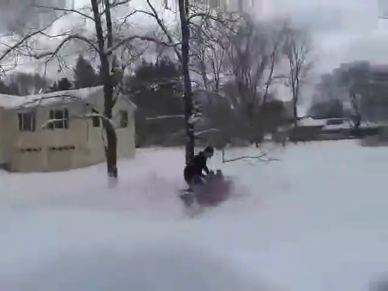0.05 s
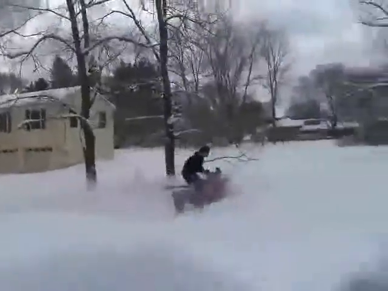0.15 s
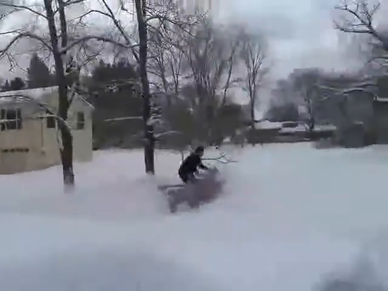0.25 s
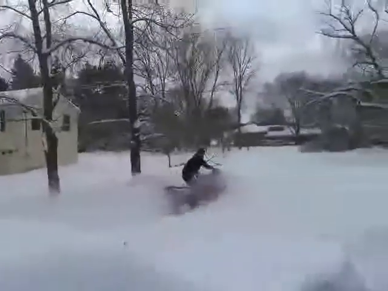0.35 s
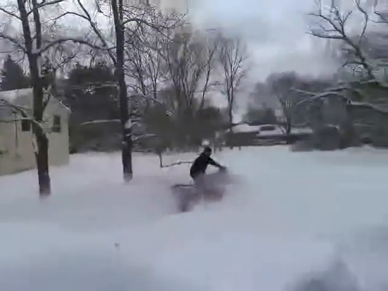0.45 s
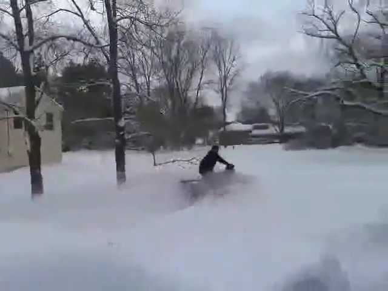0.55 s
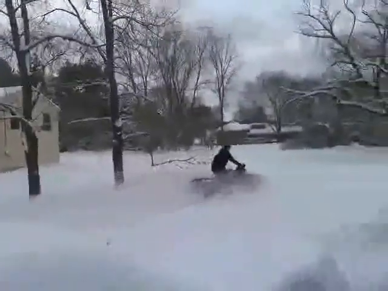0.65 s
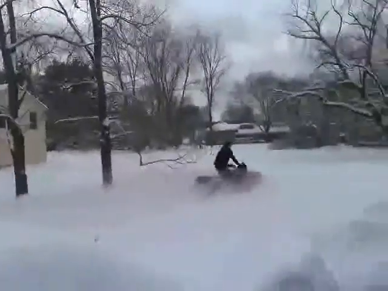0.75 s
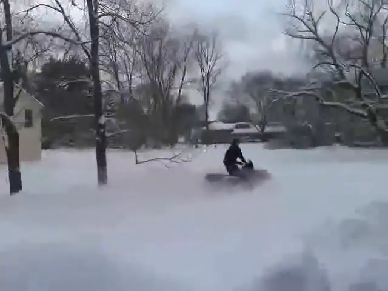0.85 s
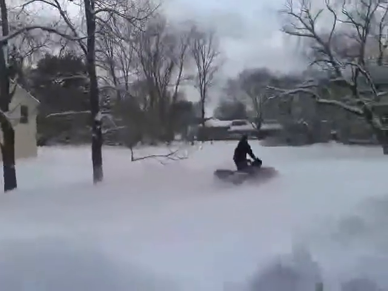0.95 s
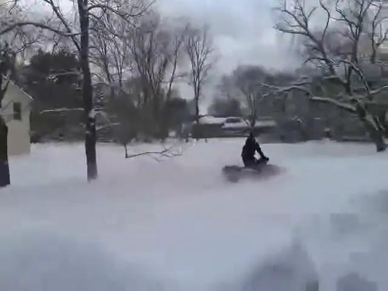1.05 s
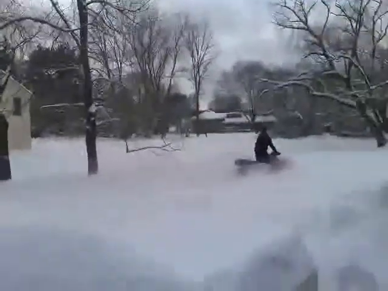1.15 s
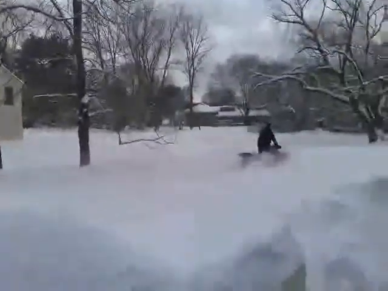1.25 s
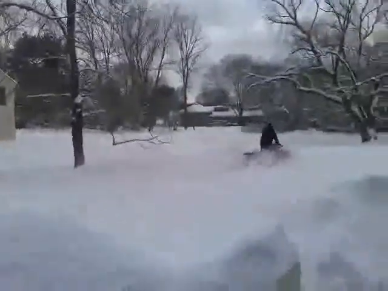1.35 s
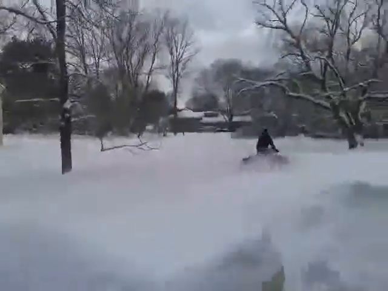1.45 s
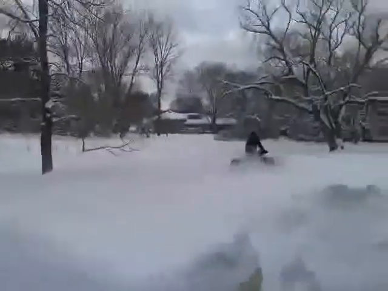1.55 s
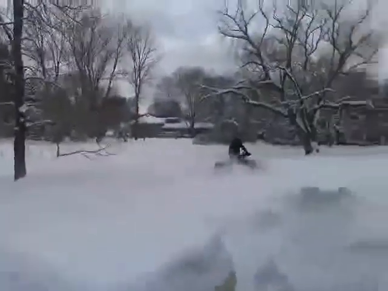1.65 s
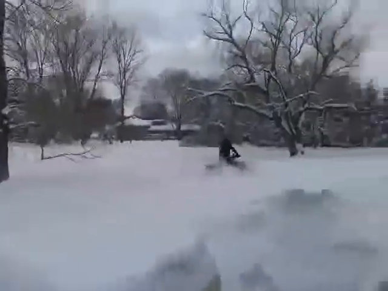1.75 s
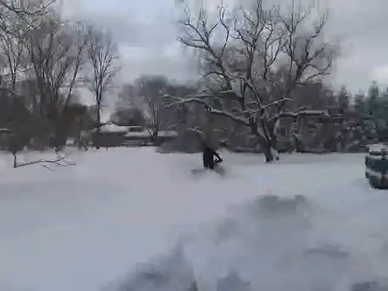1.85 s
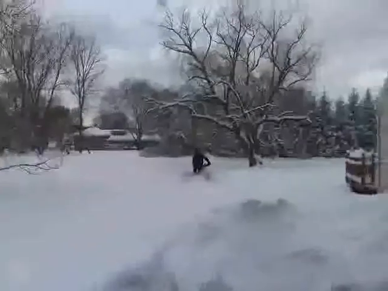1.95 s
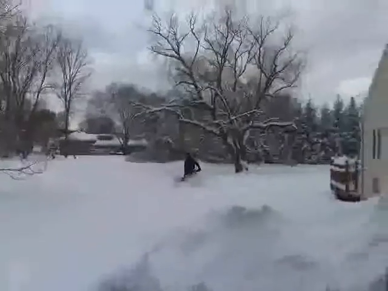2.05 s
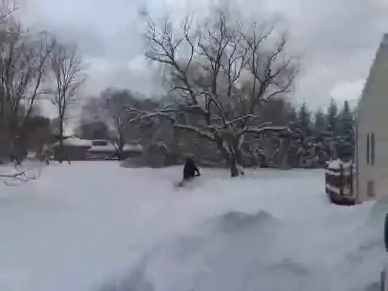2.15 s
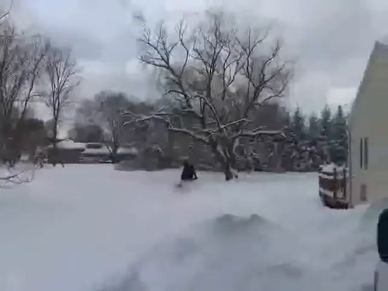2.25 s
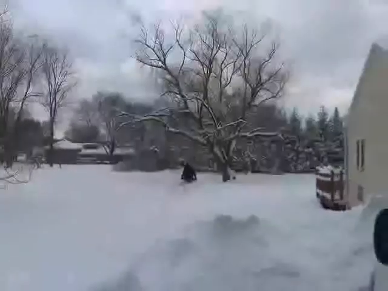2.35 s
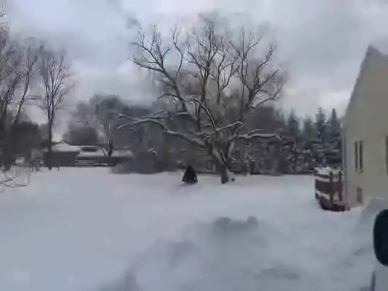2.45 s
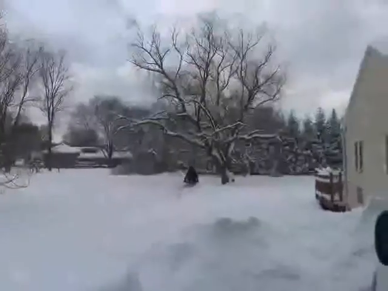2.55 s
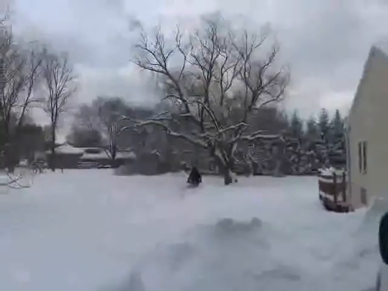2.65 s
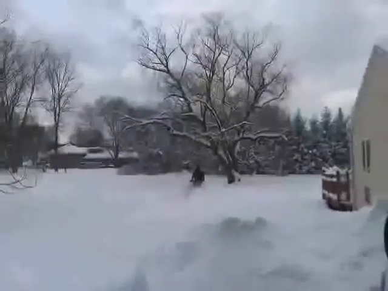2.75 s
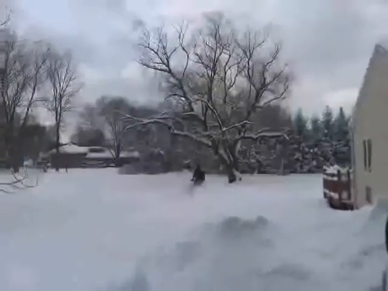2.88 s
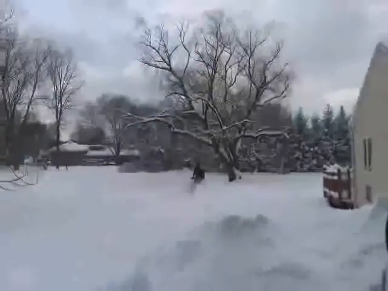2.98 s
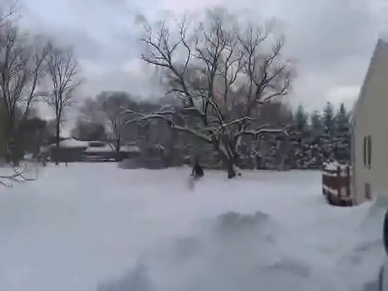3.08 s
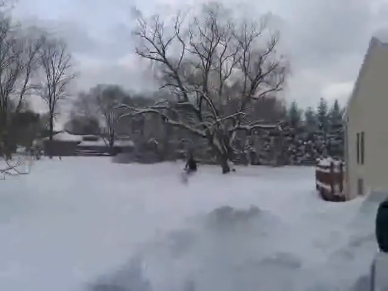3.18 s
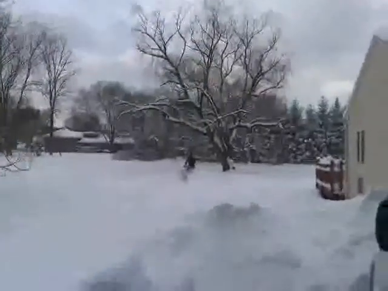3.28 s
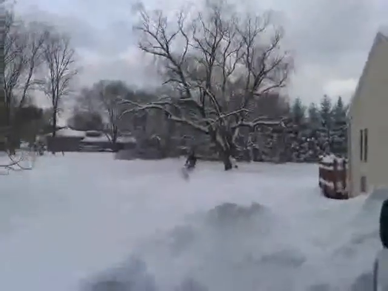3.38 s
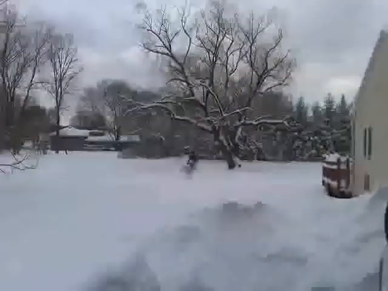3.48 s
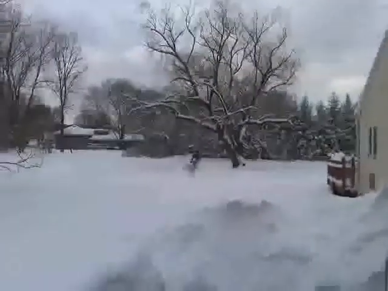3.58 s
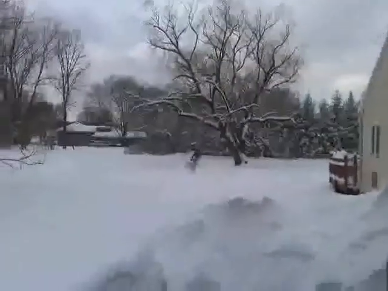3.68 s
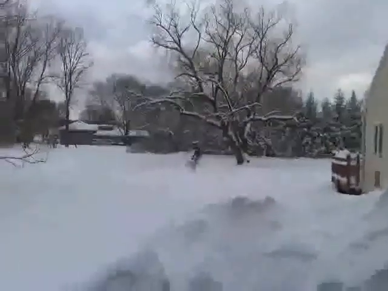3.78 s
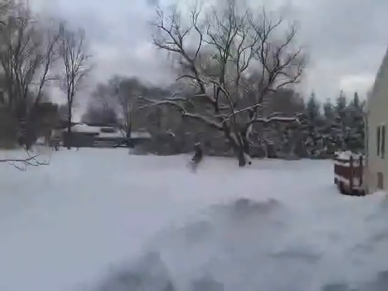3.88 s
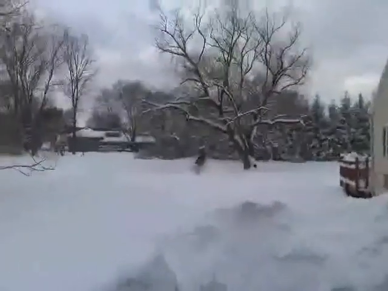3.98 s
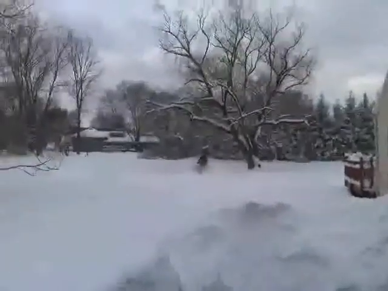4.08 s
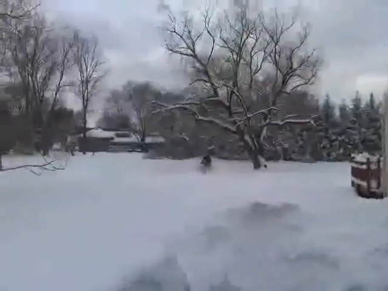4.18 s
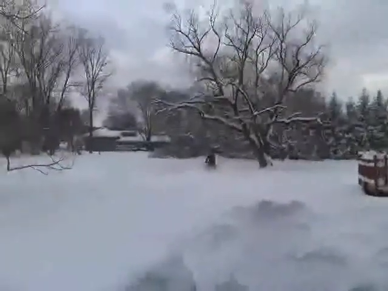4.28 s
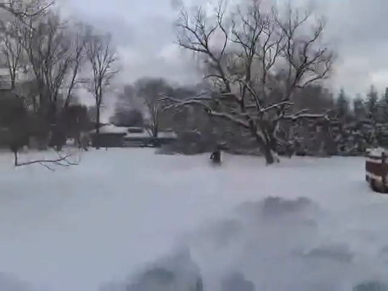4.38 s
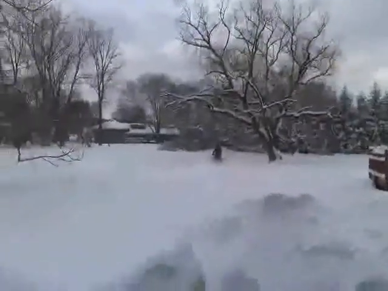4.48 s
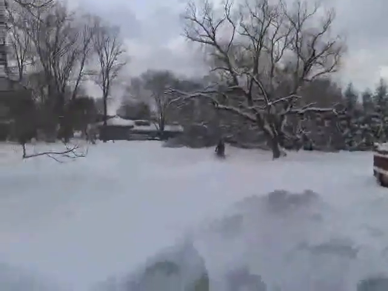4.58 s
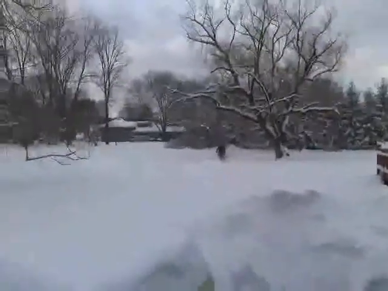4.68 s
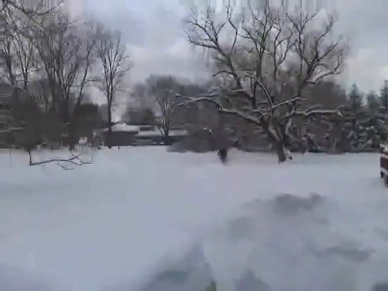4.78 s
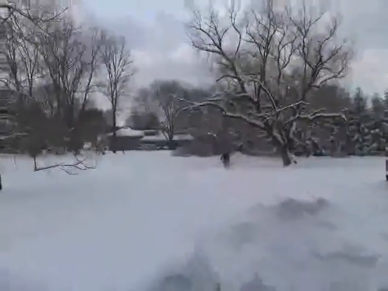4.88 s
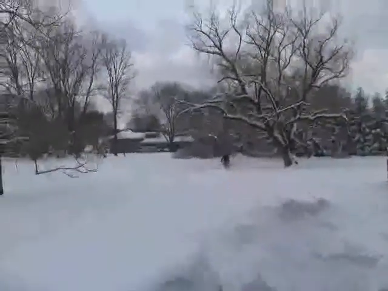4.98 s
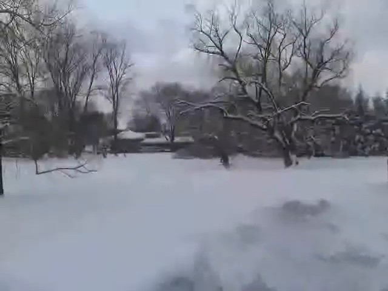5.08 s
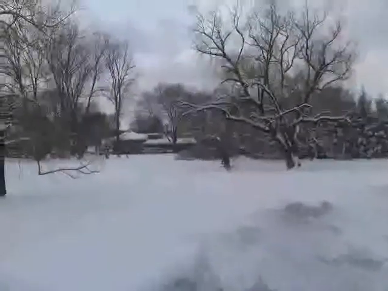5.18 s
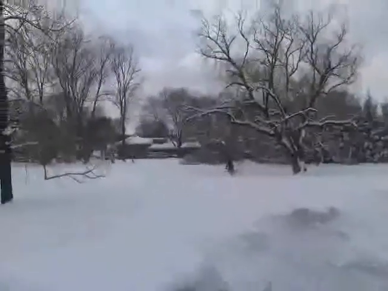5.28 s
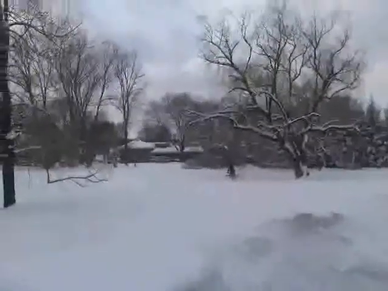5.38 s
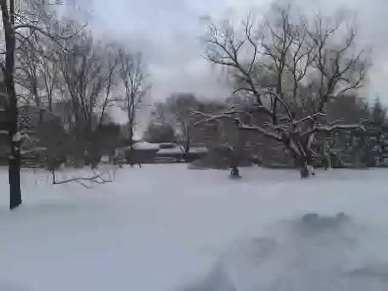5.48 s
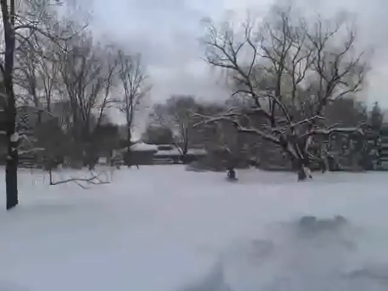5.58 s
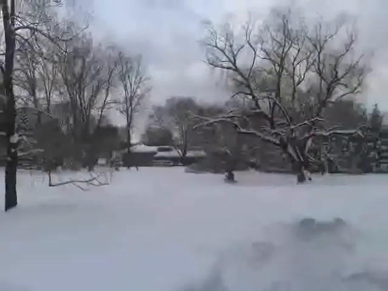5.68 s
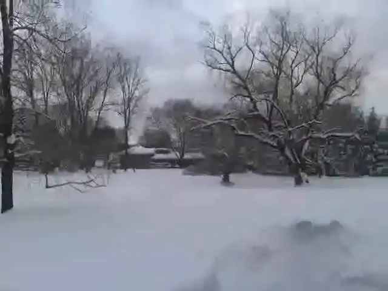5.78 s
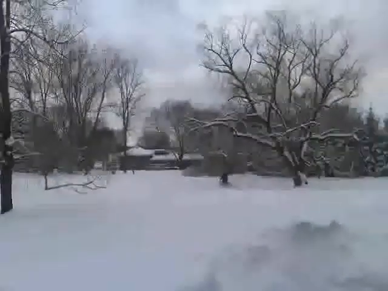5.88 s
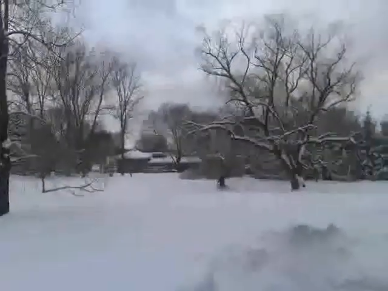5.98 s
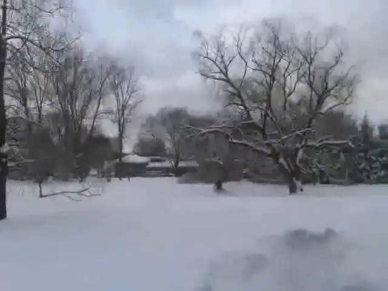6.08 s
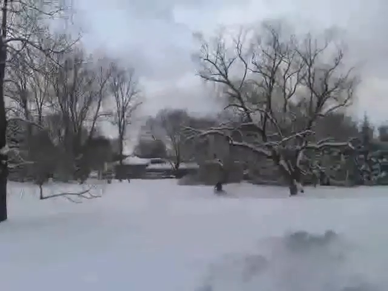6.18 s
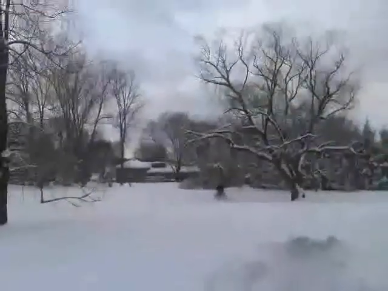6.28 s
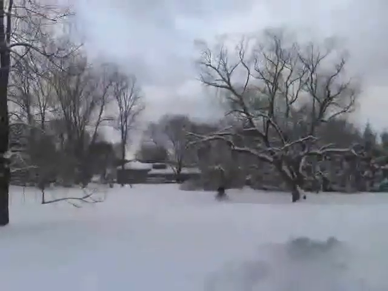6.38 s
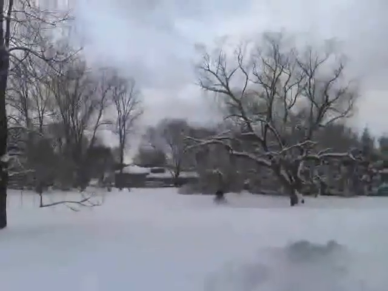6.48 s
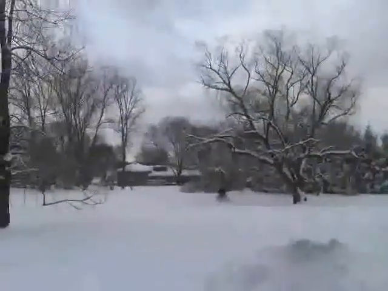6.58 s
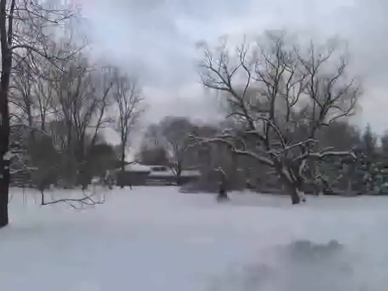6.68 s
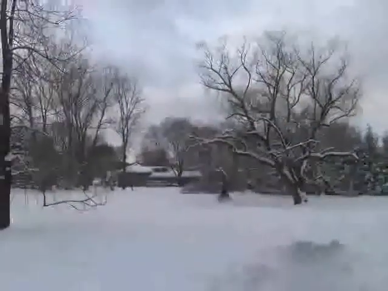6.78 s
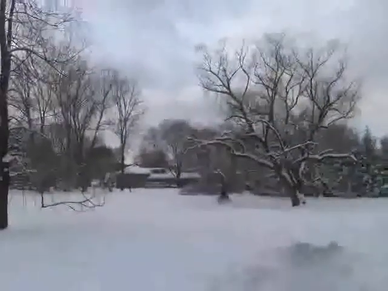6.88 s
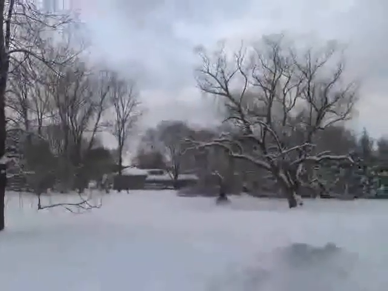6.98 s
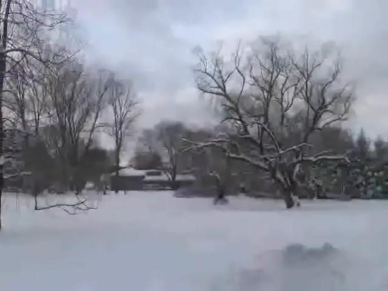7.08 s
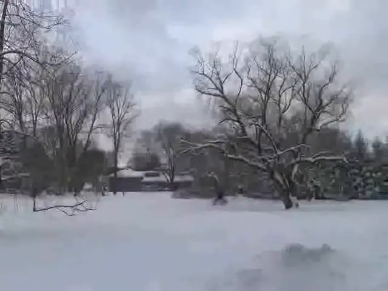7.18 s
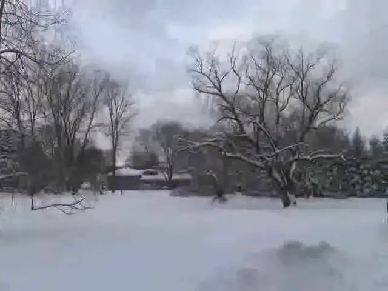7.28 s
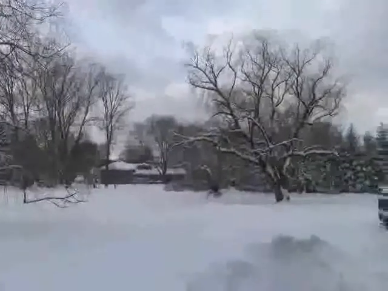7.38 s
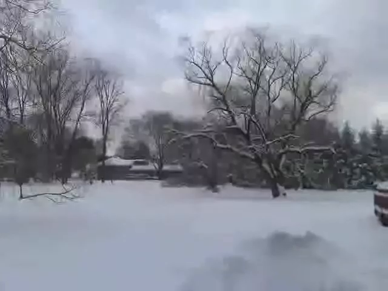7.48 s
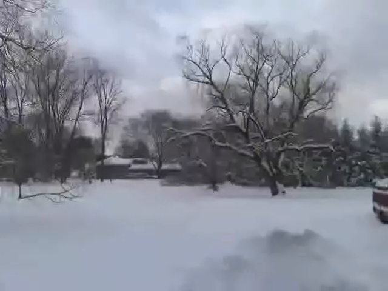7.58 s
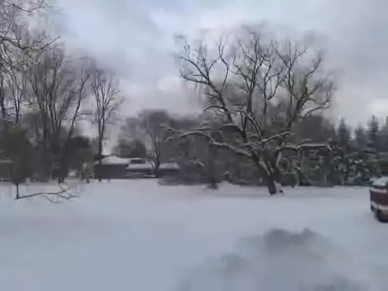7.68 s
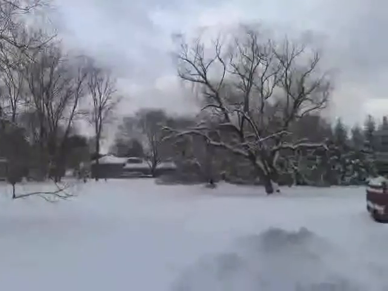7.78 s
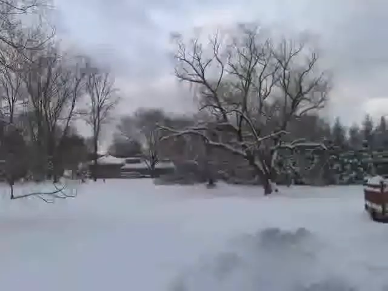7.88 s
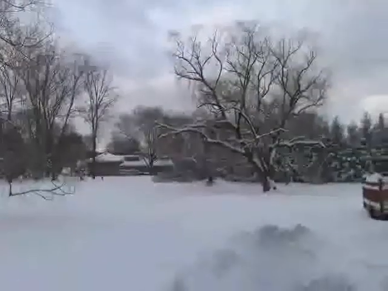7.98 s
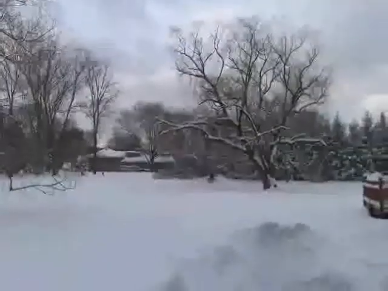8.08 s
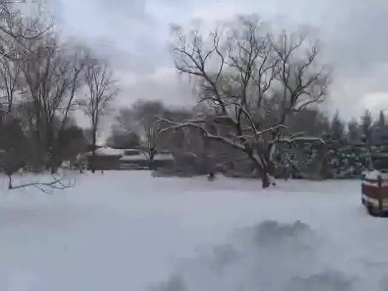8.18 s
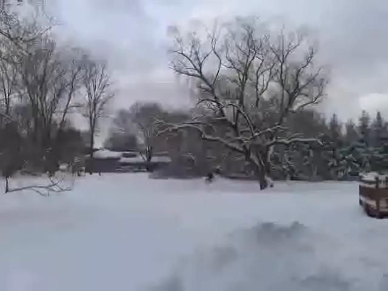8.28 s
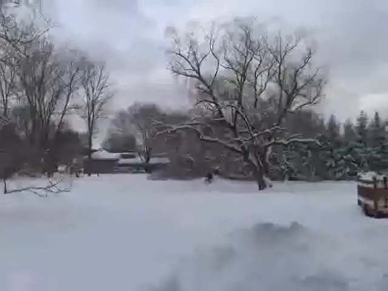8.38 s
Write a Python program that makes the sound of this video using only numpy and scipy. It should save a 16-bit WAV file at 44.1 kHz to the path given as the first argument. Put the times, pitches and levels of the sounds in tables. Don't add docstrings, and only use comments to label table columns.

```python
import sys
import numpy as np
from scipy import signal
from scipy.fft import rfft, irfft, dct
from scipy.io import wavfile
from scipy.ndimage import uniform_filter1d

SR = 44100
rng = np.random.default_rng(int(sys.argv[2]) if len(sys.argv) > 2 else 0)


def field_ratio(decibels):
    return 10 ** (np.asarray(decibels, dtype=float) / 20)


def store_wav(level_fs):
    pcm = np.round(np.clip(np.atleast_2d(level_fs), -1, 1) * 32767)
    wavfile.write(sys.argv[1], SR, pcm.T.astype(np.int16))


N = 372644

# pitch_hz, density_db
HISS = [(60, -1), (120, -0.5), (200, -1.5), (1000, 4), (3000, -3), (5000, -9.5), (11000, -5.5),
        (14500, -17.5)]
HISS_DB = -56
# pitch_hz, step_db, share of the loudness followed (0-1)
ROUNDING_STEPS = [(20, -37, .5), (165, -40.5, .5), (180, -58, 0), (10300, -56, 0), (10450, -42, .35),
                  (12450, -37, .45), (12550, -29, 0), (14500, -27, 0)]
STEP_MOOD_DB = 1.44
# centre_s, length_s, pitch_hz, width_hz, level_db
FLARES = [(0.18, 0.046, 1000, 530, -44.5), (2.486, 0.11, 5900, 510, -38), (2.864, 0.58, 1060, 61.4, -45),
          (4.1, 0.15, 1050, 80, -49.5), (1.722, 0.24, 3600, 2800, -39.5), (1.78, 0.14, 980, 1100, -48),
          (5.131, 0.029, 6960, 6300, -43), (0.14, .11, 430, 320, -46), (.85, 0.18, 680, 210, -45),
          (1.4, 0.22, 12000, 2900, -44.5), (2.7, 0.17, 5300, 820, -47), (8, 0.12, 2100, 720, -53),
          (7.76, 0.062, 2600, 43, -57), (7.75, 0.062, 3160, 50, -57), (.1, .12, 1100, 630, -44),
          (7.68, .14, 1900, 110, -55), (7.67, .07, 1500, 120, -56.5), (7.7, 0.056, 2320, 150, -57),
          (6.6, 0.17, 2430, 120, -58.5), (6.58, 0.015, 2500, 700, -52)]
# time_s, pitch_hz, level_db
WHISTLES = [
    [(6.18, 1105, -58), (6.28, 1070, -46), (6.5, 1000, -47), (6.7, 972, -47), (7.05, 955, -51),
     (7.4, 950, -61), (7.9, 945, -50), (8.3, 905, -52), (8.44, 900, -52)],
    [(7.5, 1790, -65), (7.58, 1825, -49), (7.7, 1880, -45), (7.83, 1932, -45), (7.92, 1915, -70)],
    [(7.6, 2790, -62), (7.78, 2815, -47), (7.95, 2790, -54), (8.3, 2735, -51), (8.4, 2720, -62)],
    [(7.65, 3140, -64), (7.75, 3160, -50), (7.92, 3170, -60)],
]
# delay_s, wander_s, level_db
REFLECTIONS = [(.0009, 0.00013, -19), (.0023, 0.000084, -11), (.0036, 0.0001, -15.5)]

# time_s, firing_rate_hz
CRANK_SPEED = [(0.0, 44.9), (0.17, 44.8), (0.55, 33.31), (1.19, 43.35), (1.36, 37.44), (2.03, 39.11),
               (2.14, 41.59), (2.7, 43.95), (3.26, 42.34), (3.78, 36.7), (3.97, 40.54), (4.25, 38.46),
               (4.87, 41.95), (5.37, 37.74), (5.59, 40.08), (5.93, 39.52), (6.58, 31.89), (8.45, 33.27)]
# centre_s, length_s, rate_change_hz
SLIPS = [
    (3.6, .14, -1.15),
    (6.72, .1, .85),
    (7.45, .15, -1),
    (7.8, .15, 1.15),
    (8.35, .12, -.9),
]
FIRST_TURN = .159
# centre_s, length_s, level_db
SURGES = [(0.108, 0.14, 1.5), (0.527, 0.085, 0), (0.721, 0.12, 4), (1.84, 0.069, -1.5), (2.458, 0.094, 0),
          (2.725, 0.088, -2.5), (3.314, 0.063, -1), (3.42, 0.02, 2), (3.976, 0.11, 0), (4.268, 0.21, -2),
          (4.486, 0.11, 2), (4.947, 0.043, 1), (5.22, 0.17, -1), (5.894, 0.088, 1), (1.06, 0.049, 1),
          (2.137, 0.042, 2), (3.073, 0.08, 1), (5.44, 0.19, 2.5), (7.69, 0.076, 0)]
# time_s, bark_db, brightness_db per octave as the pipe swings round, drone_db as the tail faces us
ENGINE = [(0.0, -37, -0.5, 5), (0.59, -42, 0.5, 3.5), (0.64, -41, -1, 4.5), (1.11, -31, -0.4, 0.5),
          (1.27, -36.5, -0.2, 1), (1.97, -41, 2, 2.8), (2.09, -35.5, 3.5, -1.5), (2.85, -40.5, 4, 2.5),
          (3.11, -38.5, 0.8, -0.5), (3.58, -44.5, -2, -1), (4.0, -39.5, -1, -1), (4.19, -41.5, 1.5, -2),
          (4.94, -40.5, -1, -3), (5.27, -47.5, -0.3, 0.5), (5.39, -45.5, 1.6, -2), (7.2, -51, -1, 1),
          (7.74, -49.5, -1.2, -0.3), (8.45, -51, 0.5, -0.5)]
# time_s, share (0-1)
HEADING = [(0, .95), (.22, 0.8), (.4, 0.2), (1.9, 0.2), (2.3, 0.9), (5.9, 0.8), (6.6, 0.3), (8.45, .6)]

# pitch_hz, density_db
ROAR = [(60, -24), (156, -18.5), (224, -17), (294, -13), (560, -9.5), (760, -5.5), (1000, -4.5),
        (1300, -41)]
# pitch_hz, side_db, rear_db
PIPE = [(80.8, -18.5, -34.5), (117, -12, -19), (170.5, -16, -15.5), (275.5, -7, -11.5), (362, -8, -8),
        (506, -10, -5.5), (599, -15.5, -7.5), (772, -14.5, -13.5)]
PIPE_TOP_HZ = 809
BOOM_HZ, BOOM_WIDTH_HZ, BOOM_DB = 218.2, 28, 15
# pitch_hz, width_hz, level_db
CHAMBERS = [(502, 45, 3), (744, 37, 8.5), (892, 50, 13)]
# time_s, boom_db, higher_orders_db, roar_db
CLARITY = [(0, 5, 0, 0), (.15, 5, -1, 0), (.25, -3, -3, -1), (.6, -2, -2, -1), (1.2, -2, -1, -2),
           (2.0, -1, -2, -5), (2.2, 0, 0, -4), (3.1, 0, -1, -3), (3.4, 0, -3, -1), (4.3, -1, -3, -1),
           (4.55, -3, -2, -1), (5.1, -4, -2, -1), (5.25, -3, -4, 0), (5.45, -4, -3, 0), (6.0, -3, -4, 0),
           (6.3, -3, -6, 1), (6.8, -9, -5, 1), (8.45, -10, -5, 1)]
SINGING = {6: [(.33, 0.12, 6), (1.0, .25, 2)], 7: [(.9, 0.22, 5), (2.45, .2, 4)], 8: [(2.8, 0.45, 5),
           (.1, .12, 4)], 9: [(.62, 0.14, 3), (1.1, 0.074, 4.5), (4.3, 0.18, 4), (6.17, .12, 8)],
           10: [(.15, 0.14, 4), (2.5, 0.52, 4), (6.9, 0.34, 6)], 11: [(.4, 0.11, 6), (1.7, 0.33, 4)],
           12: [(.8, 0.14, 4.5), (1.3, .15, -9.5), (2.4, .35, -1), (3.1, 0.11, -3.5), (4.0, .08, 4),
           (4.8, 0.27, 3), (5.7, 0.36, 6.5)], 13: [(.04, .06, 8), (2.4, 0.34, 4), (3.0, .15, 7)],
           14: [(1.5, .12, 9)], 15: [(.75, 0.053, 6.5), (1.5, .12, 7.5)], 18: [(.95, 0.12, 7.5),
           (4.75, 0.23, 6.5)], 19: [(5.85, .15, 9)], 22: [(4.8, .3, 8), (5.8, .2, 8)], 23: [(3.9, .3, 8),
           (5.6, .3, 6)]}
SECOND_PUFF_TURN, SECOND_PUFF_SHARE = 1 / 3, .45
SNOW_DB_PER_S = 0.45
DRONE_DB, DRONE_FOLLOWS = -50, 0.9
ORDERS_DB, OPEN_HZ, ORDERS_DB_PER_HZ = -2, 36.3, 0.4

# pitch_hz, width_hz, level_db
CASING = [(4400, 900, -4), (5490, 420, 0.5), (5823, 400, 0), (6710, 940, -1), (7730, 760, -1.5),
          (8680, 600, -0.5), (9720, 570, -1), (10840, 810, -2), (12050, 1300, -5), (13730, 1600, -10)]
START_M, AWAY_M_PER_S = 12, 6.5
RATTLE_DB, RATTLE_LOSS_DB_PER_M = 4, 0.14
CASING_DULL_DB_PER_M = 0.0774
HIDDEN_S, HIDDEN_DB = 2.42, -2
COAST_S, COAST_DB, POP_COAST_DB = 6.0, -2, -3

# pitch_hz, width_hz, level_db
BARK = [(947, 100, -4.5), (1091, 79, -1.5), (1270, 130, -1.5), (1520, 120, 2), (1879, 220, -3),
        (2144, 120, -0.5), (2404, 230, -2.5), (2839, 130, 1), (3162, 130, -1), (3582, 140, -4),
        (3915, 110, -8)]
VALVE_TURN, VALVE_DB = .31, -6
POP_DB, POP_DB_PER_SURGE = -5.5, -0.14
POP_SIDE_DB = -4
# start_s, peak_db, pitch_hz
CRACKS = [(1.409, -24, 1580), (1.544, -25, 3980), (1.571, -20, 3880), (1.596, -23, 2390),
          (1.621, -23, 3980), (1.6994, -21, 1480), (1.7262, -18.5, 4220), (1.984, -21.5, 3940),
          (2.0193, -27.5, 3090), (2.0355, -19, 1490), (2.062, -23.5, 1500), (2.085, -22, 2650),
          (2.11, -16, 2070), (2.2292, -22, 2660), (2.2541, -20, 2300), (2.277, -20, 2370),
          (2.346, -22.5, 2300), (2.371, -20.5, 2820), (2.4657, -15.5, 2840), (2.626, -22, 2400),
          (2.6713, -26, 3060), (2.8323, -23.5, 1140), (2.9278, -30, 1090), (2.9482, -24, 1630),
          (2.972, -25, 2490), (2.995, -22, 1090), (3.0652, -18.5, 3660), (3.09, -21, 2470),
          (3.183, -25, 3030), (3.2056, -20.5, 2920), (3.252, -27, 1520), (3.348, -25.5, 1530),
          (3.374, -25, 3050), (3.399, -22, 2000), (3.422, -23, 2160), (3.4726, -30, 1500),
          (3.7107, -20, 1690), (3.7644, -23.5, 1050), (3.791, -24, 1530), (3.87, -23, 1050),
          (3.8966, -27.5, 2920), (3.995, -24.5, 1080), (4.02, -26.5, 2840), (4.045, -22, 2550),
          (4.1229, -24.5, 1880), (4.2235, -32, 1050), (4.3283, -23.5, 2800), (4.4046, -29, 3160),
          (4.456, -21, 1780), (4.4808, -24, 1770), (4.504, -27, 1770), (4.532, -25, 2830),
          (4.776, -22.5, 1730), (4.7995, -26, 2530), (4.8722, -23.5, 1570), (4.9214, -19, 2460),
          (5.0423, -25, 1270), (5.3755, -25, 1870), (5.402, -27.5, 1450), (5.426, -24.5, 2760)]
# start_s, peak_db, pitch_hz
STRAYS = [
    (0.966, -22, 2250),
    (1.016, -17, 1030),
    (5.805, -30, 3130),
    (5.906, -35, 1270),
    (6.0084, -31, 1440),
    (6.579, -34, 2400),
    (7.664, -31, 1534),
    (7.726, -33, 2350),
]
# start_s, peak_db, pitch_hz
SOFTER = [(0.615, -21, 1300), (0.7023, -18.5, 1260), (1.3567, -20.5, 2440), (1.4354, -24, 1520),
          (1.4631, -25, 2040), (1.49, -24, 3100), (1.518, -28, 1430), (1.777, -29, 3060),
          (1.8023, -25, 2680), (1.8277, -28.5, 1230), (1.9061, -26, 3180), (1.9574, -27, 1550),
          (2.1334, -14, 2230), (2.1585, -15.5, 2760), (2.1814, -28, 2760), (2.2044, -26, 1610),
          (2.299, -18, 2720), (2.396, -21, 2350), (2.418, -21, 1990), (2.4423, -15, 3540),
          (2.5136, -23, 1080), (2.5371, -17, 1090), (2.5664, -20.5, 1060), (2.649, -22, 2400),
          (2.7625, -25, 1580), (2.88, -23, 1590), (3.042, -20, 1080), (3.1118, -20.5, 2480),
          (3.1344, -27, 1010), (3.1578, -21, 1060), (3.2291, -24, 1080), (3.302, -30, 2820),
          (3.6032, -32, 2740), (3.737, -30, 1500), (3.8447, -24, 2790), (3.9708, -27, 1090),
          (4.1726, -26, 1520), (4.3794, -22.5, 992), (4.431, -26, 2740), (4.555, -27, 1510),
          (4.5786, -31, 2530), (4.6284, -27, 1600), (4.701, -30, 2190), (4.7501, -26, 1630),
          (4.8236, -20, 1410), (4.8963, -27, 2540), (4.945, -32, 1490), (4.9691, -24, 1740),
          (4.9931, -29, 3800), (5.3478, -25, 1560), (5.454, -32, 2070), (5.4864, -30, 1420),
          (5.6034, -26, 1290), (5.704, -33, 2040), (5.7297, -28, 1450), (5.9324, -32, 1500),
          (7.0386, -33, 2350), (7.0707, -38, 1390), (7.6357, -27.5, 2010), (7.6939, -30, 1880)]
CRACK_LIFT_DB, SOFTER_DB = 1.5, -2.5
CRACKLE_START_S, CRACKLE_END_S, CRACKLE_SHARE = 1.38, 6.1, .1
CRACKLE_DB, CRACKLE_SPREAD_DB = 6.5, -0.5


def rms_one(x):
    return x / np.sqrt(np.mean(x ** 2) + 1e-20)


def in_time(rows, outside=None):
    s, *columns = np.transpose(rows)
    t = np.arange(N) / SR
    return [np.interp(t, s, column, outside, outside) for column in columns]


def at_hz(points, hz):
    points = np.array(points)
    return np.interp(np.log(hz), np.log(points[:, 0]), points[:, 1])


def onset(start_s, length_s):
    return 1 / (1 + np.exp((start_s - np.arange(N) / SR) / length_s))


def drift(rate):
    r = np.exp(-80 * np.pi * rate / SR)
    white = rng.standard_normal(N // 40 + 2002)
    slow = signal.lfilter([1], [1, -2 * r, r * r], white)[2000:]
    return np.interp(np.arange(N) / 40, np.arange(len(slow)), rms_one(slow))


def coloured(spectrum):
    hz = np.maximum(np.arange(N // 2 + 1) * SR / N, 1)
    lines = rfft(rng.standard_normal(N)) * field_ratio(at_hz(spectrum, hz))
    return rms_one(irfft(lines, N))


def resonance(x, hz, width_hz):
    r = np.exp(-np.pi * width_hz / SR)
    feedback = [1, -2 * r * np.cos(2 * np.pi * hz / SR), r * r]
    return signal.lfilter([(1 - r * r) / 2, 0, (r * r - 1) / 2], feedback, x)


def body(x, modes, tilt_db, wander_db, wander_rate):
    middle_hz = np.sqrt(modes[0][0] * modes[-1][0])
    out = np.zeros(N)
    for k, (hz, width_hz, level_db) in enumerate(modes):
        gain_db = level_db + tilt_db * np.log2(hz / middle_hz) + wander_db * drift(wander_rate)
        out += (-1) ** k * resonance(x, hz, width_hz) * field_ratio(gain_db)
    return rms_one(out)


def burst(strikes, rise_s, fall_s):
    rise, fall = np.exp(-1 / (rise_s * SR)), np.exp(-1 / (fall_s * SR))
    opening = signal.lfilter([1 - rise], [1, -rise], strikes + 1e-18)
    gate = signal.lfilter([1], [1, -fall], opening)
    return gate * rng.standard_normal(N)


def microphone_hiss():
    return field_ratio(HISS_DB) * coloured(HISS)


def flares():
    t, white = np.arange(N) / SR, rng.standard_normal(N)
    out = np.zeros(N)
    for s, length_s, hz, width_hz, level_db in FLARES:
        swell = np.exp(-((t - s) / length_s) ** 2)
        out += field_ratio(level_db) * swell * rms_one(resonance(white, hz, width_hz))
    return out


def whistles():
    out = np.zeros(N)
    for rows in WHISTLES:
        hz = in_time(rows)[0]
        level_db = in_time(rows, outside=-120)[1] - 11.0 + 1.2 * drift(6.4)
        phase = 2 * np.pi * np.cumsum(hz) / SR + 0.11 * drift(35)
        out += field_ratio(level_db) * np.sin(phase)
    return out


def off_snow(x):
    now = np.arange(N)
    out = x.copy()
    for delay_s, wander_s, level_db in REFLECTIONS:
        delay = SR * (delay_s + wander_s * drift(.3))
        out += field_ratio(level_db) * np.interp(now - delay, now, x)
    return out


def crank():
    t = np.arange(N) / SR
    slip = sum(change * np.exp(-((t - s) / length_s) ** 2) for s, length_s, change in SLIPS)
    rate = uniform_filter1d(in_time(CRANK_SPEED)[0] + slip, size=2001)
    return FIRST_TURN + np.cumsum(rate) / SR


def surges():
    t = np.arange(N) / SR
    return sum(level_db * np.exp(-((t - s) / length_s) ** 4) for s, length_s, level_db in SURGES)


def drone(turns, behind, orders_db):
    now = np.arange(0, N, 64)
    t, rate, behind = now / SR, np.gradient(turns)[now] * SR, behind[now]
    boom_db, upper_db, roar_db = in_time(CLARITY)
    rear_pipe = np.array(PIPE)[:, ::2]
    orders = np.zeros(N)
    for k in range(2, 25):
        hz = k * rate
        near = 1 / (1 + ((hz - BOOM_HZ) / BOOM_WIDTH_HZ) ** 4)
        side_db = at_hz(PIPE, hz)
        rear_db = at_hz(rear_pipe, hz) + near * BOOM_DB
        level_db = side_db + behind * (rear_db - side_db) - 0.13 * np.maximum(hz - PIPE_TOP_HZ, 0)
        chamber_db = sum(lift_db / (1 + ((hz - centre_hz) / width_hz) ** 2)
                         for centre_hz, width_hz, lift_db in CHAMBERS)
        level_db += (.4 + .6 * behind) * chamber_db
        level_db += (1 - near) * (2.0 * drift(4)[now] - SNOW_DB_PER_S * t)
        level_db += near * boom_db[now] + (1 - near) * upper_db[now] * (hz > BOOM_HZ)
        for s, length_s, lift_db in SINGING.get(k, []):
            level_db += lift_db * np.exp(-((t - s) / length_s) ** 4)
        puffs = abs(1 + SECOND_PUFF_SHARE * np.exp(2j * np.pi * k * SECOND_PUFF_TURN))
        gain = np.interp(np.arange(N), now, puffs * field_ratio(level_db))
        phase = 2 * np.pi * (k * turns + rng.random()) + .04 * k * drift(5)
        orders += gain * np.sin(phase)
    share = np.clip(field_ratio(orders_db), 0, .94)
    roar_share = np.sqrt(1 - (share * np.minimum(field_ratio(upper_db), 1)) ** 2)
    return share * rms_one(orders) + roar_share * field_ratio(roar_db) * coloured(ROAR)


def throb(turns, depth):
    return rng.standard_normal(N) * (1 - depth * ((turns + 0.083) % 1))


def casing_rattle(gush, share, turns):
    tilt_db = -CASING_DULL_DB_PER_M * AWAY_M_PER_S * np.arange(N) / SR
    return body(.5 * share * gush + throb(turns, 0.39), CASING, tilt_db, 1.5, 2.1)


def pops(turns):
    strikes = np.zeros((2, N))
    for row, late in zip(strikes, (-.06, VALVE_TURN)):
        fired = np.flatnonzero(np.diff(np.floor(turns - late)) > 0)
        strength = np.clip(rng.standard_normal(400), -3, 1.6)
        row[fired] = field_ratio(1.6 * strength[:len(fired)])
    shape = burst(np.arange(N) == 0, .0005, 0.0015)[:600]
    repeated = signal.oaconvolve(strikes[0], shape)[:N]
    firing = .7 * burst(strikes[0], .0005, .0012) + 0.54 * repeated
    return firing + field_ratio(VALVE_DB) * burst(strikes[1], 0.00062, .002)


def exhaust_bark(gush, share, turns, tilt_db):
    source = share * gush + np.sqrt(1 - share ** 2) * throb(turns, 0.33)
    return body(source, BARK, tilt_db, 1.5, 2.3)


def crackle(turns, bark_db):
    fired = np.flatnonzero(np.diff(np.floor(turns + .08)) > 0)
    known_s = np.array(CRACKS + SOFTER)[:, 0]
    rows = []
    for at, (chance, size, pick) in zip(fired, rng.random((400, 3))):
        s = at / SR
        loaded = CRACKLE_START_S < s < CRACKLE_END_S
        clear = np.abs(known_s - s).min() > .012
        if chance < CRACKLE_SHARE and loaded and clear:
            peak_db = bark_db[at] + CRACKLE_DB + CRACKLE_SPREAD_DB * (2 * size - 1)
            rows.append((s, peak_db, BARK[int(pick * len(BARK))][0]))
    return rows


def cracks(lesser):
    out, t = np.zeros(N), np.arange(500) / SR
    events = [(s, peak_db + CRACK_LIFT_DB, hz) for s, peak_db, hz in CRACKS + STRAYS]
    events += [(s, peak_db + SOFTER_DB, hz) for s, peak_db, hz in SOFTER]
    for s, peak_db, hz in events + lesser:
        gush = rng.standard_normal(500) * (1 - np.exp(-t / 0.0005)) * np.exp(-t / 0.0013)
        gush[4] += 1.5
        pitched = resonance(resonance(gush, hz, 1100), hz, 1100)
        broad = resonance(resonance(gush, 2300, 3500), 2300, 3500)
        snap = pitched + 0.27 * broad
        at = round(s * SR)
        out[at:at + 500] += field_ratio(peak_db - 4.0) * snap / np.abs(snap).max()
    return out


def scene():
    t = np.arange(N) / SR
    level_db, tilt_db, tail_db = in_time(ENGINE)
    turns, surge_db = crank(), surges()
    bark_db = level_db + surge_db

    distance_m = START_M + AWAY_M_PER_S * t
    rattle_db = bark_db + RATTLE_DB - RATTLE_LOSS_DB_PER_M * distance_m
    rattle_db += HIDDEN_DB * onset(HIDDEN_S, 0.081) + COAST_DB * onset(COAST_S, 0.027)
    drone_db = DRONE_DB + DRONE_FOLLOWS * (bark_db + 40.0) + tail_db
    orders_db = ORDERS_DB + ORDERS_DB_PER_HZ * np.minimum(np.gradient(turns) * SR - OPEN_HZ, 0)
    pop_db = POP_DB + POP_DB_PER_SURGE * surge_db
    pop_db += POP_SIDE_DB * (t < CRACKLE_START_S) + POP_COAST_DB * (t > COAST_S)
    share = np.clip(field_ratio(pop_db), 0, .95)

    gush = rms_one(pops(turns))
    snap = rms_one(resonance(gush, 2300, 2800))
    bark = field_ratio(bark_db) * exhaust_bark(gush, share, turns, tilt_db)
    rattle = field_ratio(rattle_db) * casing_rattle(gush, share, turns)
    hard = cracks(crackle(turns, bark_db))
    bike = bark + off_snow(rattle + hard + field_ratio(bark_db - 9.0) * share * snap)
    behind = np.clip(in_time(HEADING)[0], 0, 1)
    low = field_ratio(drone_db) * drone(turns, behind, orders_db)
    mono = microphone_hiss() + flares() + whistles() + low + bike
    return np.array([mono, mono])


def spectral_rounding(x, size=1024):
    window = np.sin(np.pi * (np.arange(2 * size) + .5) / (2 * size))
    blocks = np.pad(x, (size, 2 * size - N % size)).reshape(-1, size)
    a, b, c, d = np.split(np.hstack([blocks[:-1], blocks[1:]]) * window, 4, axis=1)
    lines = dct(np.hstack([-c[:, ::-1] - d, a - b[:, ::-1]]), 4, norm="ortho")
    hz = (np.arange(size) + .5) * SR / 2 / size
    frame_db = 10 * np.log10(np.mean(lines ** 2, axis=1, keepdims=True) + 1e-12) + 40
    follow = at_hz(np.array(ROUNDING_STEPS)[:, ::2], hz)
    step = field_ratio(at_hz(ROUNDING_STEPS, hz) + follow * frame_db)
    frame_at = np.minimum(np.arange(len(lines)) * size, N - 1)
    for low_hz, high_hz in [(0, 175), (10400, 11400), (11400, 12500), (12500, SR)]:
        mood = drift(10.0)[frame_at, None]
        step = step * field_ratio(STEP_MOOD_DB * mood * (hz > low_hz) * (hz < high_hz))
    loud = np.sqrt(uniform_filter1d(lines ** 2, size=33, axis=1) + 1e-20)
    step = np.maximum(step, field_ratio(-3) * loud)
    lines = np.sign(lines) * np.floor(np.abs(lines) / step + .4) * step
    late, early = np.split(dct(lines, 4, norm="ortho"), 2, axis=1)
    frames = np.hstack([early, -early[:, ::-1], -late[:, ::-1], -late]) * window
    return (frames[1:, :size] + frames[:-1, size:]).ravel()[:N]


def band_limit(x):
    return signal.sosfilt(signal.butter(12, 14480, fs=SR, output="sos"), x)


def record(dry):
    bass_cut = signal.butter(2, 90, "high", fs=SR, output="sos")
    mono = spectral_rounding(signal.sosfilt(bass_cut, dry[0]))
    return band_limit(np.array([mono, mono]))


dry = scene()
out = record(dry)
store_wav(out)
```